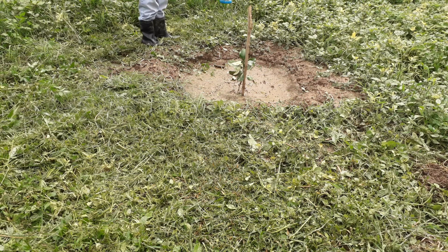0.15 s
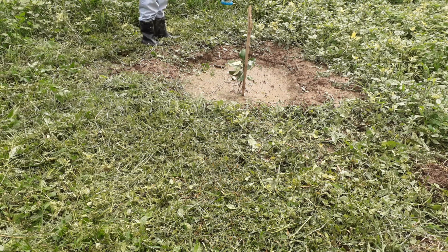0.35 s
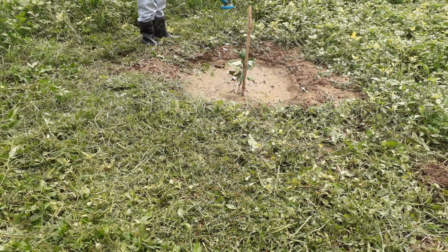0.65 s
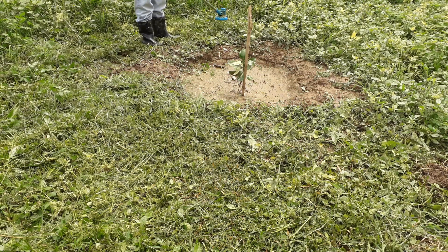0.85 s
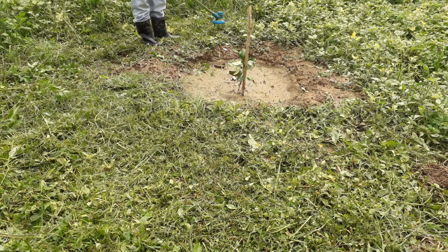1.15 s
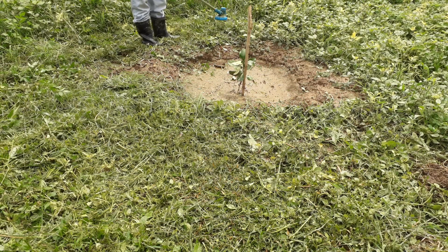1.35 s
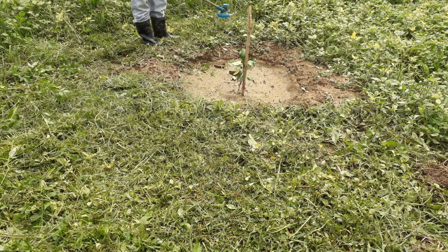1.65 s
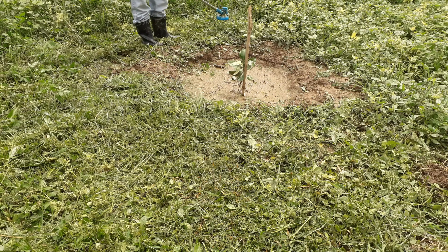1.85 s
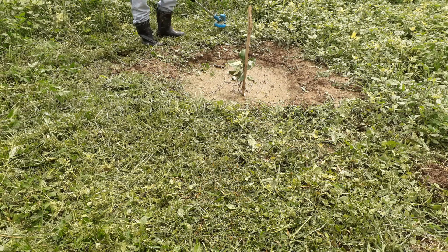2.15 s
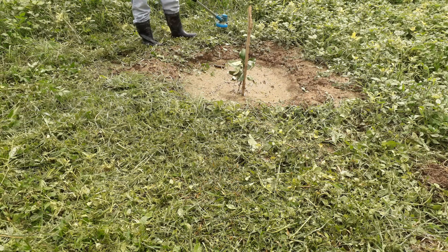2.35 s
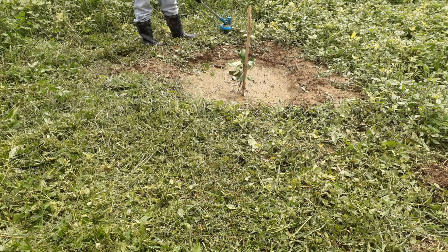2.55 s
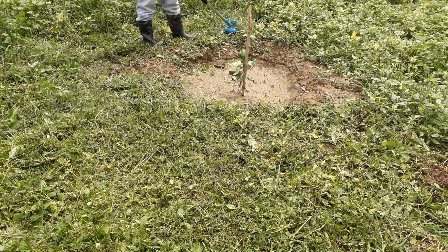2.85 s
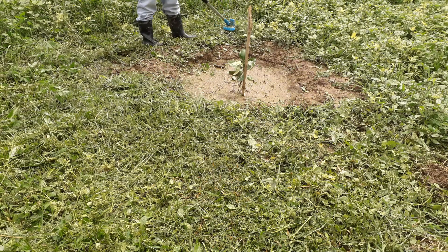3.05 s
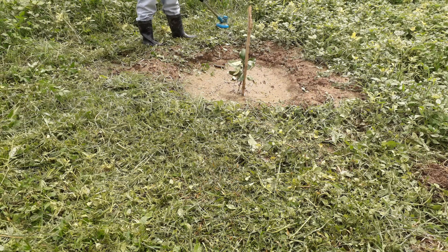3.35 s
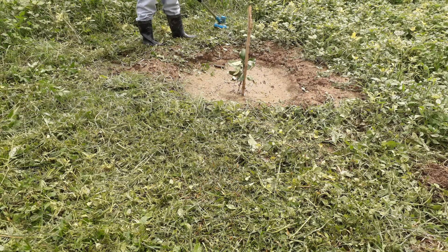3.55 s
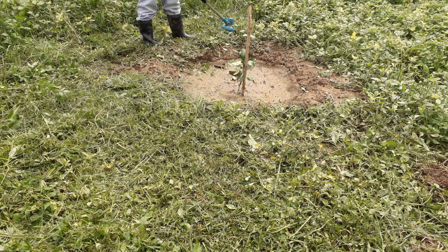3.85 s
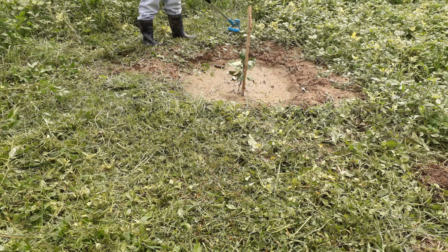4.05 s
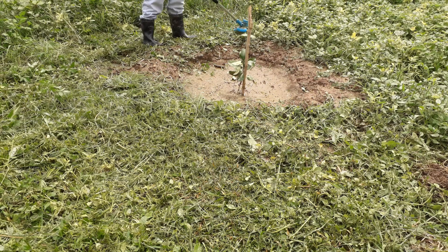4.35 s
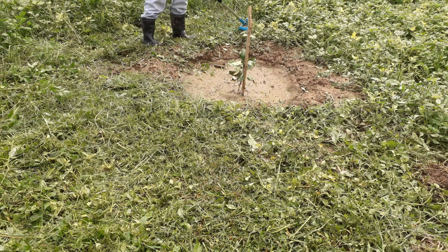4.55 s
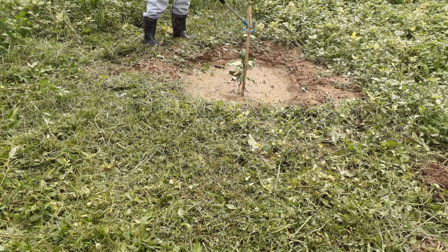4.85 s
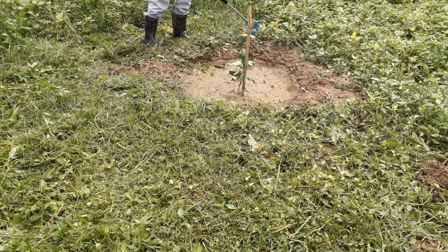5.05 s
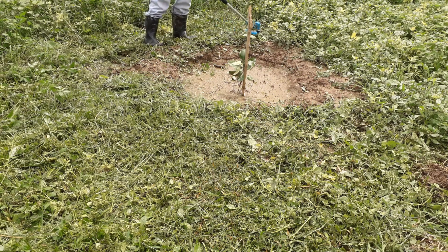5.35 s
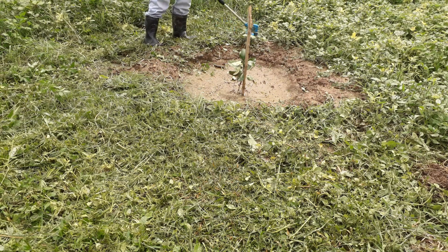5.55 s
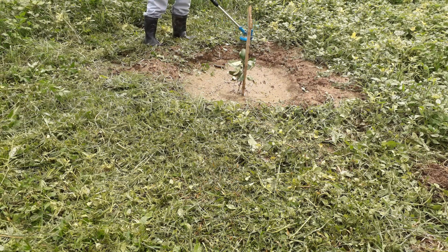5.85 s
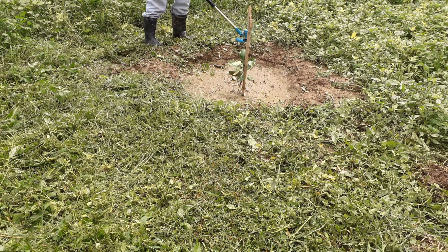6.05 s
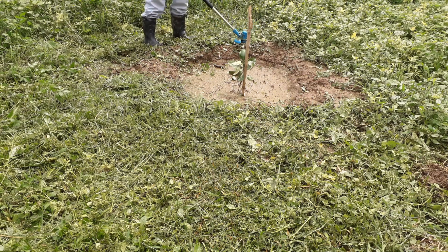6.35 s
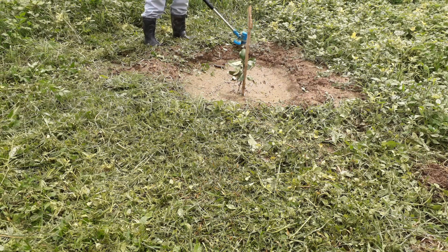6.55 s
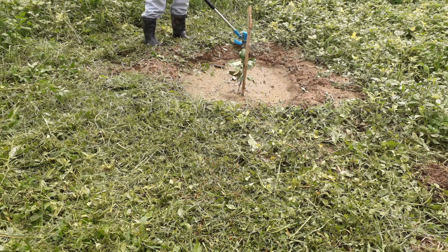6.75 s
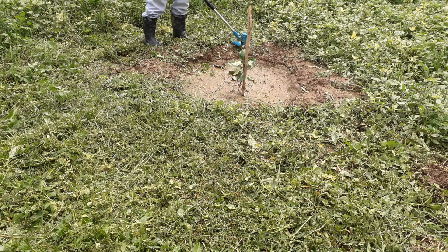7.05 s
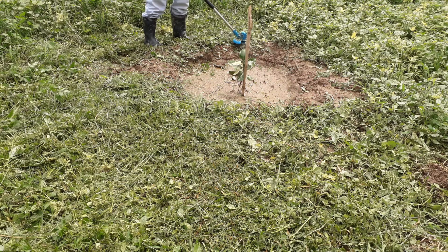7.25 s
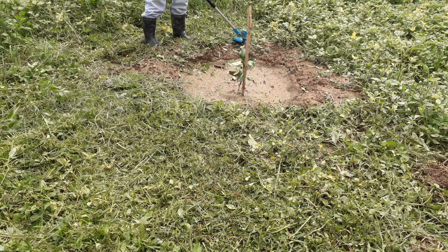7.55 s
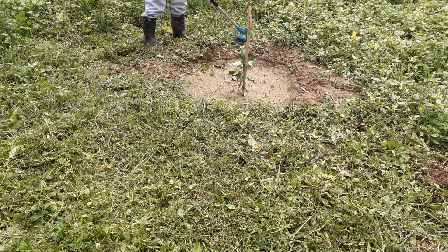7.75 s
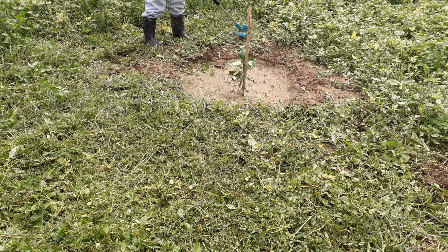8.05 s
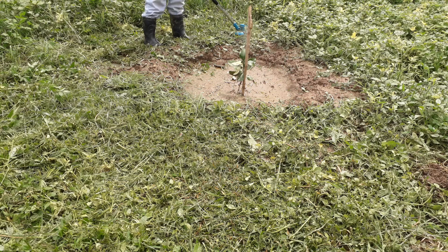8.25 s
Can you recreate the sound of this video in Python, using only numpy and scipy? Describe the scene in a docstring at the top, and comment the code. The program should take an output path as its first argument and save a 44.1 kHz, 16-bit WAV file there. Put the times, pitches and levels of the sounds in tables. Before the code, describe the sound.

Nearly two seconds of very soft outdoor ambience, with pulsing crickets, faint birds and light wind puffs. Then blades tick against grass and a small electric motor spins up into a bright, raspy whir. Repeated cuts add bursts of hiss and tearing and pull the motor down slightly. Sharp snaps, stem slaps and short metallic squeals punctuate it; the later part is louder and rougher, still running at the end. Open air, no strong echo, a few metres away.

```python
"""Insects, far birds and light wind are heard in a garden, then a small electric grass cutter spins up.
Its hum and whine are tones near multiples of the shaft speed; its rattle is noise largely repeated on every turn.
Each bite into the grass adds hiss and shredding noise and drags the speed down until the motor recovers.
Stalks snap and stems slap as short bursts of coloured noise, and rubbing noise makes resonances squeal.
Insects are noise pulsed by wing strokes, birds are gliding tones with an echo, and wind is low noise."""
import sys
import numpy as np
from scipy import signal
from scipy.fft import rfft, irfft
from scipy.io import wavfile
from scipy.ndimage import uniform_filter1d, map_coordinates

SR = 44100
rng = np.random.default_rng(int(sys.argv[2]) if len(sys.argv) > 2 else 0)


def master(y):
    """Save y as 16-bit WAV."""
    cut = np.clip(np.atleast_2d(y).T, -1, 1)
    pcm = np.round(cut * 32767)  # scale
    wavfile.write(sys.argv[1], SR, pcm.astype(np.int16))


N = 369558
T = np.arange(N) / SR  # time in seconds

# colour of hissing grass: [f/Hz, relative level per Hz/dB]
HISS_COLOUR = [(2000, -17.5), (5000, -2), (8000, -2.5), (9600, -6.5), (11000, 3.5), (13500, 0.5),
               (17000, -0.5)]
# colour of snapping stalks and rustling leaves: [f/Hz, relative level per Hz/dB]
SNAP_COLOUR = [(150, -16.5), (400, -4.5), (1300, -7.5), (2800, 1), (5000, 3.5), (8000, -3), (9500, -2.5),
               (11500, 4.5), (16000, 0)]
FREE_HZ = 150.0  # unloaded turns a second


def undb(db):
    """Turns decibels into a gain."""
    return 10 ** (np.asarray(db) / 20)


def unit(x):
    """Scales a sound to an average strength (rms) of 1."""
    return x / np.sqrt(np.mean(x ** 2))


def noise():
    """White noise: equal power at all frequencies."""
    return rng.standard_normal(N)


def walk(rate):
    """Smooth random wandering with about `rate` turns a second and a spread near 1."""
    points = rng.standard_normal(int(N / SR * rate) + 2)
    joined = np.interp(T * rate, np.arange(len(points)), points)
    return 1.4 * uniform_filter1d(joined, int(SR / rate / 2) + 1)


def colour(x, points):
    """Causal filter of unit power gain through (Hz, dB) points, falling away below the first."""
    hz, db = np.transpose(points)
    size = 4096
    bins = np.fft.rfftfreq(size, 1 / SR) + 2  # the 2 Hz shift avoids the logarithm of zero
    gain = undb(np.interp(np.log(bins), np.log(hz), db)) * np.minimum(bins / hz[0], 1)
    # folding the cepstrum makes the response start at once (minimum phase)
    cepstrum = irfft(np.log(gain))[:size // 2]
    cepstrum[1:] *= 2
    response = irfft(np.exp(rfft(cepstrum, size)))
    return signal.oaconvolve(x, response / np.linalg.norm(response))[:N]


def ring(x, hz, width_hz):
    """A resonance: the same peak filter twice for steep sides, scaled to rms 1."""
    b, a = signal.iirpeak(hz, hz / width_hz, fs=SR)
    once = signal.lfilter(b, a, x)
    return unit(signal.lfilter(b, a, once))


def arch(start, end):
    """Rises smoothly from 0 to 1 and falls back between two times."""
    return np.sin(np.pi * np.clip((T - start) / max(end - start, .01), 0, 1))


def swells(table):
    """A loudness curve of arches from (start, end, dB) rows."""
    return sum(undb(db) * arch(start, end) for start, end, db in table)


def strokes(phase, sharpness):
    """One smooth burst for each cycle of the phase, rms 1."""
    return unit(np.exp(sharpness * (np.cos(2 * np.pi * phase) - 1)))


def grains(rate, spread_db, most=2.56):
    """Tiny fractures: clicks at random moments, `rate` a second, a few much larger; rms 1."""
    size = undb(spread_db * np.minimum(rng.exponential(size=N), most))
    happens = rng.random(N) < rate / SR
    return unit(happens * np.sign(noise()) * size)


def garden():
    """Far rumble, a brief rustle of leaves and puffs of wind on the microphone, all from filtered noise."""
    # colour of the garden air: [f/Hz, relative level per Hz/dB]
    air_colour = [(25, -31), (60, -1.5), (120, 7.5), (190, -4), (270, -9), (400, -21), (1000, -21.5),
                  (1800, -28.5), (3000, -28), (6000, -35), (9500, -36.5), (11500, -25.5), (16000, -41)]
    # wind on the microphone: [start/s, end/s, level/dB]
    puffs = [(.28, .4, -62), (.6, .68, -48.5), (.71, .78, -50.5), (1.0, 1.06, -58), (3.73, 3.85, -50),
             (4.26, 4.35, -52), (5.02, 5.08, -43), (5.13, 5.23, -48), (5.27, 5.37, -48.5)]
    air = undb(-61.0 + 1.0 * walk(8.3)) * colour(noise(), air_colour)
    rustle = colour(noise() + 0.78 * grains(rate=490, spread_db=3), SNAP_COLOUR)
    leaves = undb(-67) * arch(0.55, 1.07) ** 2 * rustle
    wind = swells(puffs) * ring(noise(), hz=78.4, width_hz=67)
    return air + leaves + wind


def insects(swell_db=15, count=3):
    """Wing strokes pulse noise that rings at each insect's own pitch, over a continuous far chorus."""
    # a smaller cricket's trills, all alike: [start/s]
    trill_starts = [0, .24, .36, .63, .76, 1.06, 1.18, 1.33, 1.48]
    trill_s, trill_db = .085, -70.5
    # a bush cricket's evenly spaced, swelling buzzes: first start, spacing, length, final level
    buzz_first_s, buzz_every_s, buzz_s, buzz_db = 0.262, 0.77, 0.47, -61.5
    swell = 0
    for start in buzz_first_s + buzz_every_s * np.arange(count):
        progress = np.clip((T - start) / buzz_s, 0, 1)
        sounding = (progress > 0) & (progress < 1)
        swell = swell + undb(buzz_db - swell_db * (1 - progress) ** 2) * sounding
    fast_wings = strokes(np.cumsum(193 + 6 * walk(20)) / SR, sharpness=1.3)  # about 193 strokes a second
    slow_wings = strokes(82 * T, sharpness=1.8)
    buzz = ring(noise() * fast_wings, hz=8010, width_hz=310) * uniform_filter1d(swell, size=400)
    trills = swells([(s, s + trill_s, trill_db) for s in trill_starts])
    trill = ring(noise() * slow_wings, hz=7080, width_hz=570) * trills
    chorus_db = -69.5 - 6.1 * arch(0.58, 1.37) + walk(5.2)  # dips for a while
    chorus = ring(noise(), hz=4785, width_hz=400) * undb(chorus_db)
    high_chorus = undb(-76) * ring(noise(), hz=7400, width_hz=870)
    return buzz + trill + chorus + high_chorus


def birds(echo_s=0.079):
    """Gliding tones with a shaky, hoarse pitch, smeared by the trees between."""
    # far bird notes: [start/s, end/s, first f/Hz, middle f/Hz, last f/Hz, level before the echo mix/dB]
    notes = [(0.238, 0.362, 2800, 2750, 2600, -66.5), (0.333, 0.435, 792, 906, 1090, -70),
             (0.404, 0.641, 1200, 1187, 1040, -66), (0.592, 0.92, 1000, 1062, 1134, -66),
             (0.687, .78, 2750, 2800, 2750, -70), (1.134, 1.23, 2310, 2500, 2600, -73),
             (1.55, 1.616, 3000, 2900, 2700, -67)]
    song = 0
    for start, end, first_hz, middle_hz, last_hz, db in notes:
        glide_hz = np.interp(T, [start, (start + end) / 2, end], [first_hz, middle_hz, last_hz])
        hz = glide_hz * (1 + 0.055 * walk(500))
        tone = np.sin(2 * np.pi * np.cumsum(hz) / SR)
        song = song + np.sqrt(2) * undb(db) * arch(start, end) * tone
    trees = (noise() * np.exp(-T / echo_s))[:SR // 2]
    echo = signal.oaconvolve(song, trees / np.linalg.norm(trees))[:N]
    return 0.55 * song + 0.53 * echo


def snaps(turns, tail_db=-23):
    """Stalks break with a sharp crack and a short rustle; clumps crackle densely, in time with both blade tips."""
    # stalks and grit struck: [t/s, level before a common 5.5 dB lift/dB, treble gain/dB]
    struck = [(1.854, -40, -6), (2.0603, -23, 4), (2.0758, -23.5, -8), (2.11, -19.5, -18),
              (2.1496, -21, -10), (2.158, -19.5, 6), (2.2257, -27, -14), (2.257, -20, 22),
              (2.3018, -21.5, 2), (2.5612, -9, 9), (2.5722, -11, 6), (3.5992, -10.5, 11), (4.185, -11, 2),
              (4.2476, -9, -4), (4.938, -10.5, 0), (5.4883, -12, -11), (5.6145, -6, 3), (5.8915, -3.5, 1),
              (5.9455, -4.5, -5), (5.9528, -3.5, 3), (7.1521, -7.5, 0), (7.3213, -13, 16),
              (7.5577, -11, -9), (7.599, -5.5, 3), (7.6175, -10.5, -8), (7.6304, -10, 0), (7.6552, -8, 19),
              (7.6997, -6.5, 1), (7.7076, -12, -11)]
    # thick growth crackling against the blade: [start/s, end/s, level/dB]
    clumps = [(1.92, 2.08, -62), (2.085, 2.145, -40), (2.13, 2.34, -48.5), (2.53, 2.68, -40),
              (5.85, 5.93, -24.5), (7.52, 7.67, -43), (7.68, 7.725, -25)]
    crack_s, rustle_s = .0008, .011  # fading times
    cracks = np.zeros(N)
    t = T[:1500]
    fade = np.exp(-t / crack_s) + undb(tail_db) * np.exp(-t / rustle_s)
    for s, db, treble_db in struck:
        crack = rng.standard_normal(len(t)) * fade
        dull = uniform_filter1d(crack, size=4)
        crack = dull + undb(treble_db) * (crack - dull)
        at = int(s * SR)
        cracks[at:at + len(t)] += undb(db + 5.5) * crack / np.linalg.norm(crack)
    crackle = grains(rate=2400, spread_db=3.5) * strokes(2 * turns, sharpness=0.93) * swells(clumps)
    return colour(cracks + crackle, SNAP_COLOUR)


def lag(x, seconds):
    """Follows its input gradually, with a time constant."""
    keep = np.exp(-1 / (seconds * SR))
    return signal.lfilter([1 - keep], [1, -keep], x)


def shaft_speed(drag_hz, flutter=0.001418):
    """Turns a second: the motor climbs to its free speed; inertia smooths the drag of the grass."""
    # switch-on time, then time constants of gathering speed and of answering a load
    switch_on_s, spin_up_s, recover_s = 1.865, .375, .459
    free_hz = FREE_HZ * (1 - np.exp(-np.maximum(T - switch_on_s, 0) / spin_up_s))
    loaded_hz = np.maximum(free_hz - lag(drag_hz, recover_s), 1)
    return loaded_hz * (1 + flutter * walk(25))


def rotor_tones(turns, speed_hz, facing, waver_db=0.59, drift=0.19, shake_turns=0.0015):
    """Tones on whole multiples of the shaft speed; high ones come in last and waver most as the head swings."""
    # tones of the rotor: [multiple of shaft speed (rounded for the pitch), level at free speed/dB,
    # rise when fully facing/dB]
    tones = [(1, -65, 7), (2, -50, 5), (3.08, -52, 3), (4.05, -61.5, 18), (5, -68.5, 5.5), (6.1, -56, 14),
             (6.9, -52, 7), (8, -62, 4), (9, -69.5, 12.5), (10, -67, 9), (11, -54.5, -16),
             (12.1, -58.5, 4.5), (13.3, -56.5, 5), (14, -55.5, -17), (14.3, -58, 3.5), (16.1, -53, -8),
             (18, -61, -1.5), (26, -99, -6)]
    # the housing lifts tones passing through its resonances: [f/Hz, half width/Hz, lift/dB]
    housing = [(439, 35, 6), (1820, 99, 3.5)]
    # growth per doubling of speed, and the extra growth for each octave of the multiple
    tone_speed_db, overtone_speed_db = 10.5, 7
    shaken = turns + shake_turns * walk(180)  # grass jolts the blade, which blurs the high multiples
    octaves = np.log2(speed_hz / FREE_HZ)
    out = 0
    for multiple, db, rise_db in tones:
        sway = np.sqrt(multiple)
        growth_db = octaves * (tone_speed_db + overtone_speed_db * np.log2(multiple))
        housing_db = sum(lift_db / (1 + ((multiple * speed_hz - hz) / width_hz) ** 2)
                         for hz, width_hz, lift_db in housing)
        gain = undb(db + growth_db + housing_db + rise_db * facing + waver_db * sway * walk(9))
        cycles = round(multiple) * shaken + rng.random()
        out = out + np.sqrt(2) * gain * np.cos(2 * np.pi * cycles + drift * sway * walk(3))
    return out


def rattle(turns, memory, size=320):
    """Rubbing noise, `size` points a turn, of which each turn largely repeats the one before; rms 1."""
    fresh = rng.standard_normal((N // 120, size))
    track = signal.lfilter([1], [1, -memory], fresh, axis=0).ravel()
    return unit(map_coordinates(track, [turns * size], order=3, mode="wrap"))


def tip_ticks(turns, scatter_db=2):
    """A sharp tick as each of the two blade tips comes round; rms 1."""
    passes = 2 * turns
    step = np.abs(np.gradient(passes)) + 1e-12
    ticks = np.maximum(1 - np.abs(passes - np.round(passes)) / step, 0)
    return unit(ticks * undb(scatter_db * walk(300)))


def shifting(x, patchy_db=1.46):
    """The ground reflection moves with the head, so neighbouring bands swell and fade on their own."""
    out, below = 0, 0
    for hz in np.geomspace(2200, 7000, num=6):
        low = signal.sosfiltfilt(signal.butter(4, hz, fs=SR, output="sos"), x)
        band = low - below
        out = out + band * undb(patchy_db * walk(6.5))
        below = low
    return out + x - below


def shredding(turns, shred_gain, hiss_gain, tuft):
    """The blade rattles, ticks and tears grass; at a one-sided tuft the hiss bunches into one swish a turn."""
    # colour of the rattle: [f/Hz, relative level per Hz/dB]
    rattle_colour = [(200, -10), (600, -5.5), (1250, -5.5), (1900, -3), (2800, 0), (4400, -0.5),
                     (6200, -6.5), (8500, -6), (11000, -14)]
    side = turns + 0.0573 * walk(2)  # where on its circle the blade meets the grass
    both_tips = strokes(2 * side, sharpness=0.079)
    one_swish = strokes(side, sharpness=1.8)
    swish = np.sqrt((1 - tuft) * both_tips ** 2 + tuft * one_swish ** 2)
    ticks = undb(-8 + 2 * walk(7)) * tip_ticks(side)
    fibres = grains(rate=2000, spread_db=7)
    rubbing = rattle(turns, memory=0.67) * strokes(side, sharpness=0.12)
    body = unit(rubbing + ticks + .5 * fibres)
    fine_fibres = grains(rate=3600, spread_db=7.5)
    hiss = unit(noise() + 0.28 * rattle(turns, memory=0.4) + 0.79 * ticks + 1.45 * fine_fibres) * swish
    flicker = undb(1.0 * walk(140))
    return shifting(colour(body * shred_gain, rattle_colour)) + colour(hiss * hiss_gain * flicker, HISS_COLOUR)


def squeals(turns, scrape=0.53):
    """A rub at one point of every turn rings a resonance."""
    # parts of the head set ringing: [start/s, end/s, f/Hz, width/Hz, level/dB]
    ringing = [(2.355, 2.574, 1800, 245, -55.5), (3.38, 3.85, 1840, 400, -51),
               (3.417, 3.78, 5603, 400, -51.5), (4.96, 5.103, 3240, 300, -51),
               (5.144, 5.649, 7800, 1301, -46.5), (5.9, 6.454, 1860, 239, -44),
               (7.06, 7.149, 895, 299, -41.5), (7.315, 7.565, 1850, 350, -47), (7.424, 7.6, 1110, 220, -46),
               (7.915, 8.02, 3388, 296.3, -46)]
    once_a_turn = tip_ticks(turns / 2, scatter_db=2.5)
    rub = once_a_turn + scrape * rattle(turns, memory=0.88) * strokes(turns, sharpness=0.91)
    out = 0
    for start, end, hz, width_hz, db in ringing:
        tone = ring(rub, hz, width_hz)
        tone = tone / np.sqrt(np.abs(uniform_filter1d(tone ** 2, size=2500)) + 1e-9)  # steady pressure
        out = out + undb(db) * np.sqrt(np.abs(arch(start, end))) * tone
    return out


def bites():
    """What the grass does to the blade: drag in Hz, hiss gain, shredding gain and one-sidedness."""
    # bites into grass, values at full depth: [start/s, end/s, drag before inertia/Hz,
    # hiss before uneven feed/dB, shredding before uneven feed/dB, one-sidedness/0-1]
    bite_rows = [(2.601, 3.043, 23.8, -34.5, -45, 0.06), (3.235, 3.49, 7.8, -39, -55, 0.3),
                 (3.515, 3.889, 11.1, -41, -51, 0), (3.958, 4.32, 8.9, -36.5, -48.5, 0),
                 (4.328, 4.791, 3.6, -43, -62, 0.03), (4.741, 4.913, 27.7, -35.5, -42.5, 0),
                 (4.932, 5.208, 5, -37, -46, 0.26), (5.453, 5.81, 1.86, -43, -46.5, 0.2),
                 (5.84, 5.954, 23.5, -31, -29, 0), (6.452, 6.671, 12.2, -35, -39.5, 0.83),
                 (6.903, 7.191, 13.4, -34.5, -47, 0.38), (7.4, 7.673, 6.6, -37, -40.5, .5),
                 (7.65, 7.731, 23, -36, -42, 0.5), (7.931, 8.042, 30.4, -33, -52, 0),
                 (8.092, 8.249, 48.6, -34, -40, 0)]
    edge_s = .137  # the blade takes this long to enter or leave the grass
    start, end, drag_hz, hiss_db, shred_db, one_sided = np.transpose(bite_rows)
    depth = np.array([np.clip(np.minimum(T - s, e - T) / edge_s + .5, 0, 1) for s, e in zip(start, end)])
    tuft = np.clip(one_sided @ depth, 0, 1)
    return drag_hz @ depth, undb(hiss_db) @ depth, undb(shred_db) @ depth, tuft


def slaps(turns):
    """Stems whip against both blade tips: stout ones knock, thin ones sizzle."""
    # slapping stems: [start/s, end/s, knock level/dB, sizzle relative to knock/dB]
    whips = [(2.925, 3.023, -45.5, 6.5), (3.768, 3.881, -49, 17), (4.8, 4.86, -47.5, 12.5),
             (4.944, 5.06, -46.5, 0), (5.705, 5.77, -52, 17), (5.773, 5.878, -33.5, -1),
             (6.498, 6.619, -48, 13), (7.92, 8.026, -45, 9)]
    # knock of a stout stem: [f/Hz, relative level per Hz/dB]
    stem_colour = [(500, -20), (1600, -14.5), (2500, 2), (4000, -9), (6000, -9.5), (10000, -25)]
    ticks = tip_ticks(turns, scatter_db=5.0)
    knock = swells([(start, end, db) for start, end, db, _ in whips])
    sizzle = swells([(start, end, db + treble_db) for start, end, db, treble_db in whips])
    return colour(ticks * knock, stem_colour) + colour(ticks * sizzle, HISS_COLOUR)


def cutter(feed_db=1.97):
    """Bites load the motor; its speed sets pitch and loudness, and the shaft angle times the rattle and cutting."""
    # how far the swinging head is turned towards the listener: [t/s, facing/0 = away, 1 = fully]
    head_turns = [(3.0, 0.11), (4.2, 0.028), (4.65, 0.17), (4.95, 0.23), (5.45, 0.15), (5.8, 0.81),
                  (6.05, 0.62), (6.7, 0.89), (7.25, 0.86), (7.55, 0.99), (7.8, 0.72), (8.0, 0.44),
                  (8.35, 0.37)]
    idle_hiss_db, idle_rattle_db = -40.5, -43  # the blade running free at full speed
    facing_rattle_db = 4  # rise of the free-running rattle when fully facing
    noise_speed_db = 21  # growth per doubling of speed
    rush_from_hz, rush_full_hz = 84, 129.6  # between these speeds the air starts to rush and the head to rattle
    drag_hz, hiss, shred, tuft = bites()
    speed_hz = shaft_speed(drag_hz)
    turns = np.cumsum(speed_hz) / SR
    rush = np.interp(speed_hz, [rush_from_hz, rush_full_hz], [0, 1])
    pace = undb(noise_speed_db * np.log2(speed_hz / FREE_HZ)) * rush
    facing_s, amount = np.transpose(head_turns)
    facing = np.interp(T, facing_s, amount)
    # air stirred by the blade, louder for a moment
    wash = undb(-57.5 + 7.7 * arch(6.344, 7.52)) * ring(noise(), hz=132, width_hz=100)
    # flying bits of stalk: 14 ticks a second
    stray = undb(-48.5) * colour(grains(rate=14, spread_db=3), HISS_COLOUR)
    # the motor sings on a high multiple while it gathers speed
    slot_angle = 2 * np.pi * 30 * turns
    run_up = undb(-62 + 2 * walk(58)) * arch(2.3, 2.55) * np.sin(slot_angle + 0.64 * walk(140))
    feed = undb(feed_db * walk(30))  # grass reaches the blade unevenly
    idle_rattle = pace * undb(idle_rattle_db + facing_rattle_db * facing)
    idle_hiss = pace * undb(idle_hiss_db)
    shred_gain = np.hypot(idle_rattle, feed * shred)
    hiss_gain = np.hypot(idle_hiss, feed * hiss)
    grass = shredding(turns, shred_gain, hiss_gain, tuft)
    awake = np.clip((speed_hz - 60) / 62, 0, 1)  # the tones are silent while it turns slowly
    rotor = awake * rotor_tones(turns, speed_hz, facing)
    return rotor + pace * (wash + stray) + run_up + squeals(turns) + grass + slaps(turns) + snaps(turns)


def scene():
    """Everything adds up at one microphone."""
    return (garden() + insects() + birds() + cutter())[None]


def record(dry):
    """The recorder cuts the top: a steep low-pass filter removes sound above about 15850 Hz."""
    return signal.sosfilt(signal.ellip(10, .2, 70, 15850, fs=SR, output="sos"), dry)


dry = scene()
out = record(dry)
master(out)
```